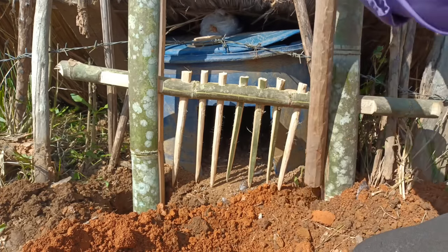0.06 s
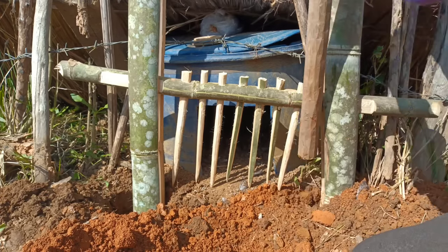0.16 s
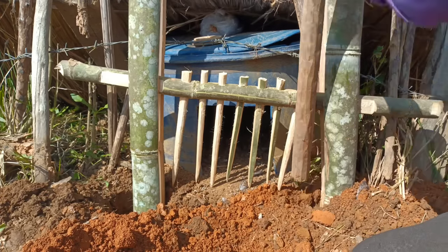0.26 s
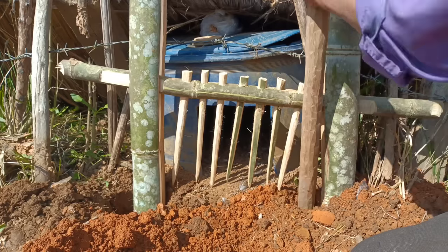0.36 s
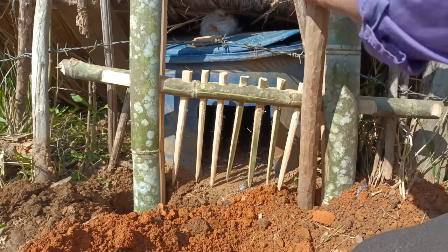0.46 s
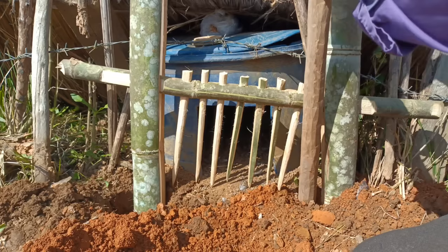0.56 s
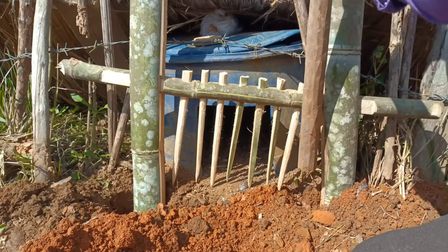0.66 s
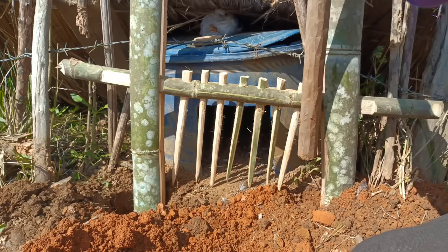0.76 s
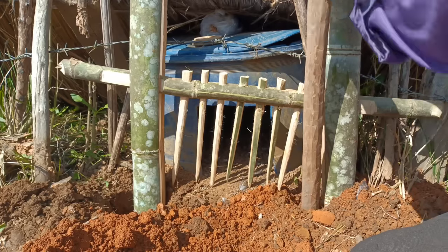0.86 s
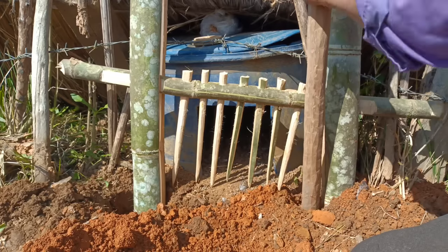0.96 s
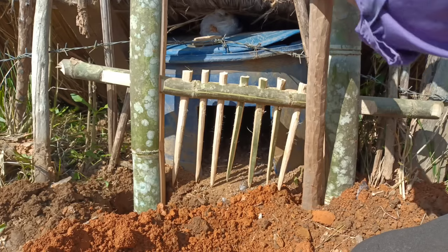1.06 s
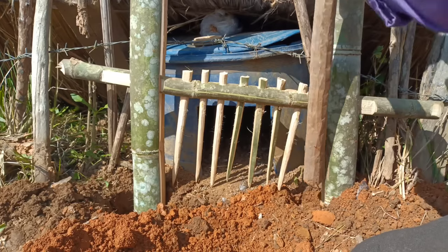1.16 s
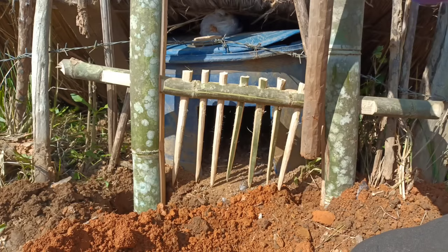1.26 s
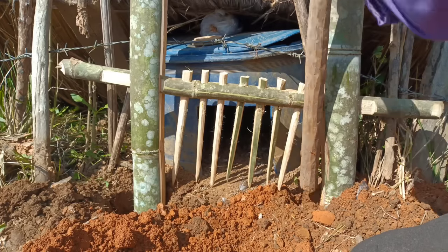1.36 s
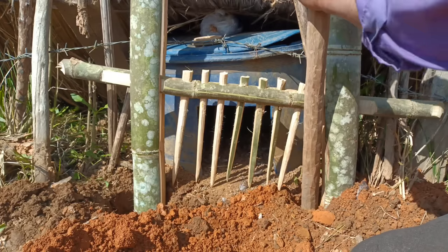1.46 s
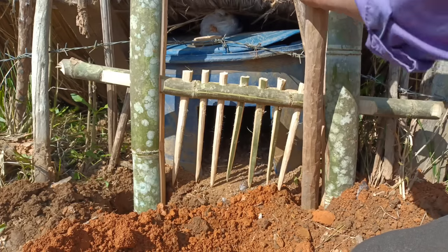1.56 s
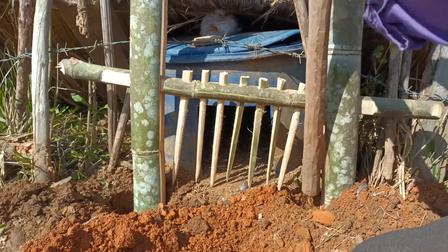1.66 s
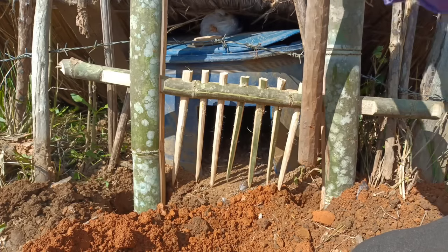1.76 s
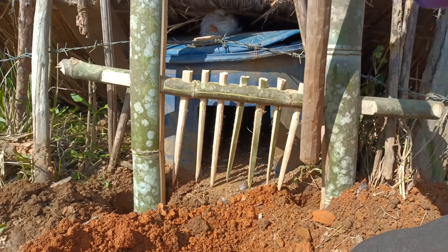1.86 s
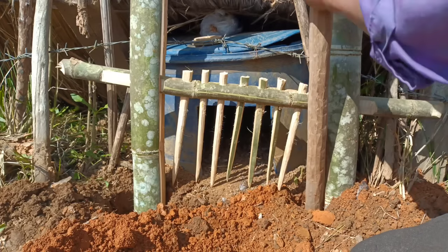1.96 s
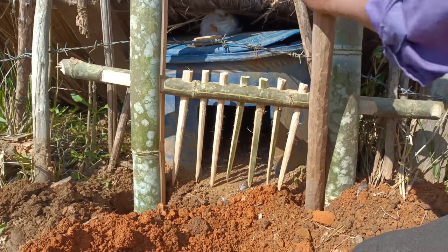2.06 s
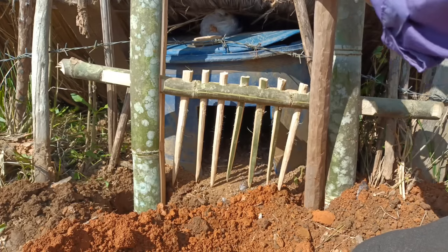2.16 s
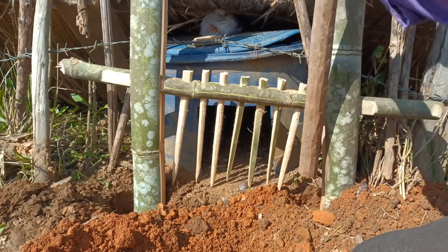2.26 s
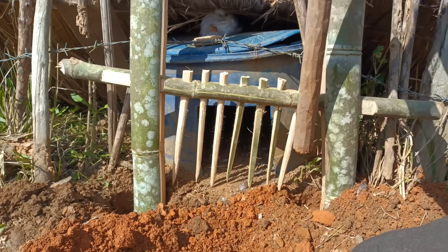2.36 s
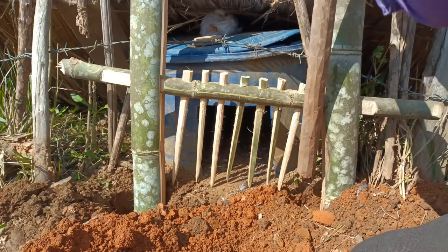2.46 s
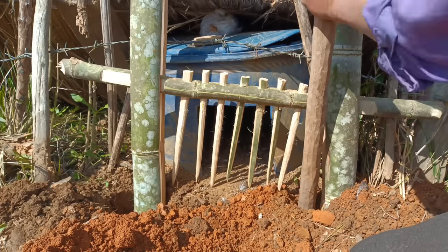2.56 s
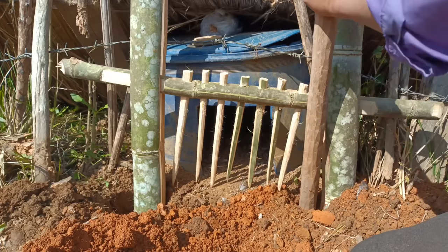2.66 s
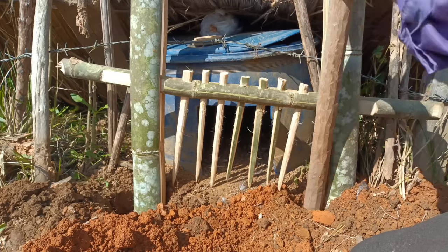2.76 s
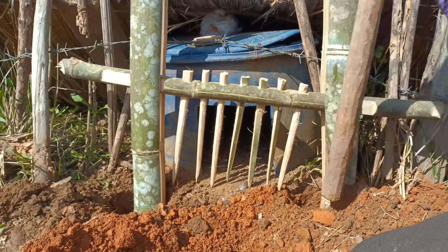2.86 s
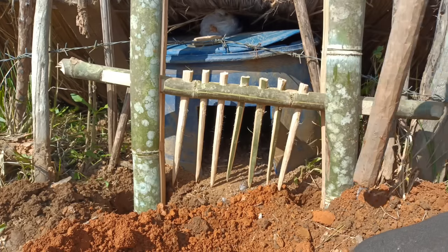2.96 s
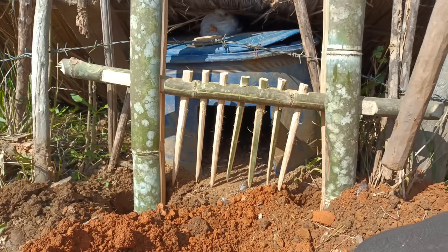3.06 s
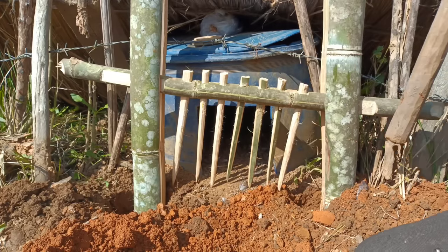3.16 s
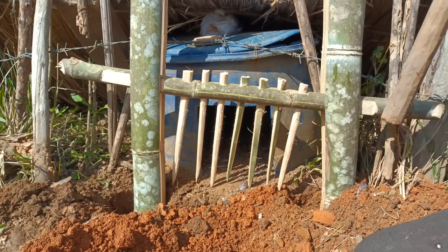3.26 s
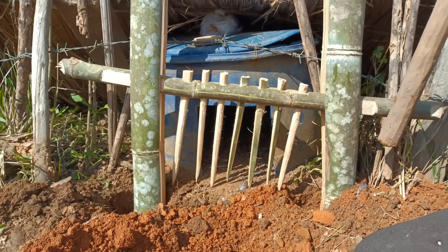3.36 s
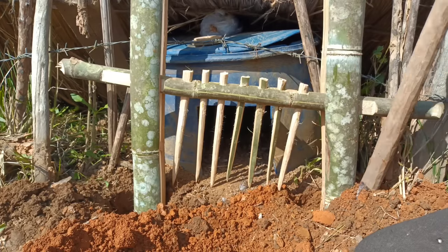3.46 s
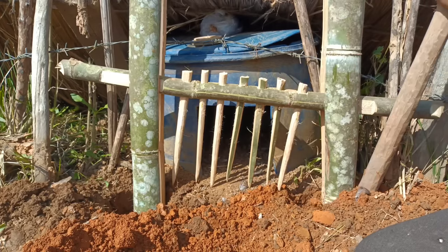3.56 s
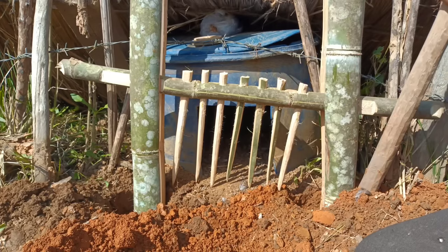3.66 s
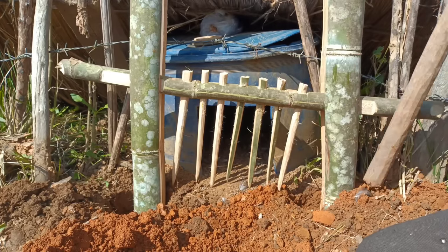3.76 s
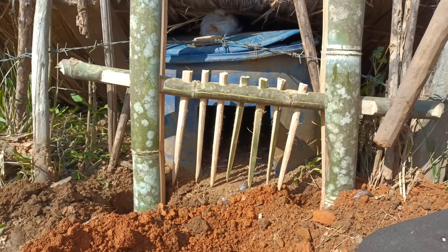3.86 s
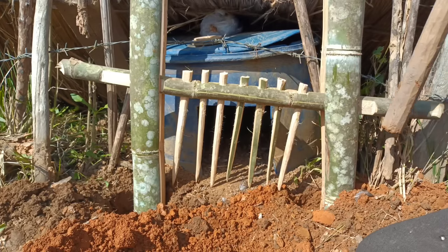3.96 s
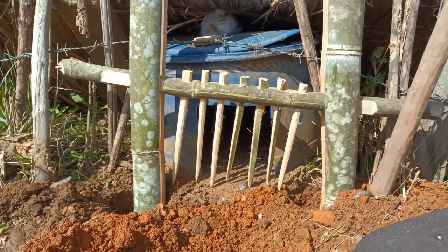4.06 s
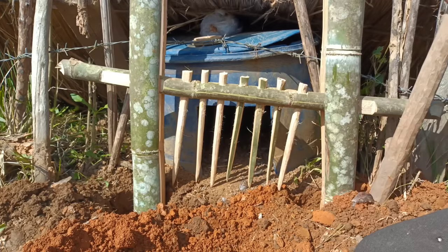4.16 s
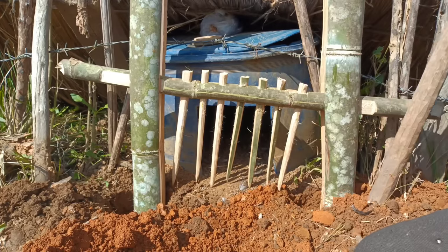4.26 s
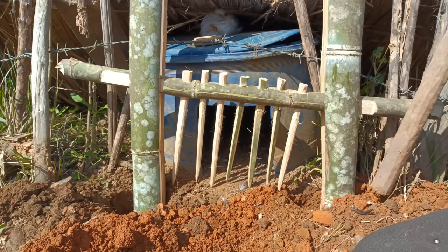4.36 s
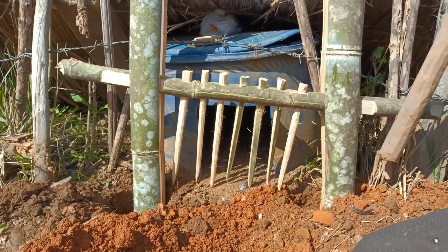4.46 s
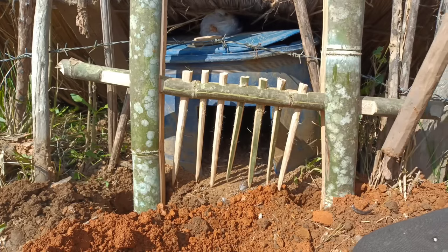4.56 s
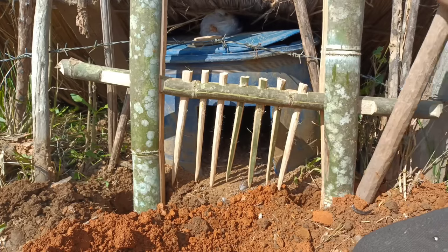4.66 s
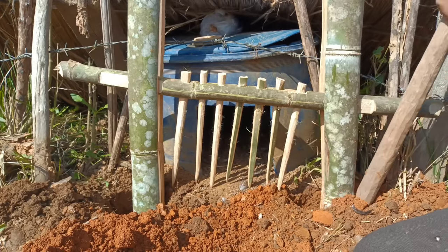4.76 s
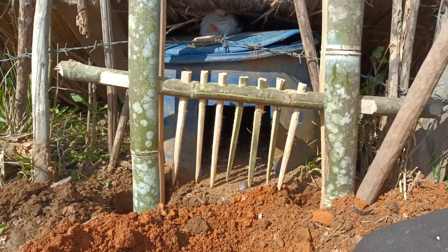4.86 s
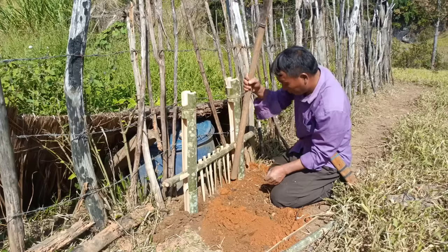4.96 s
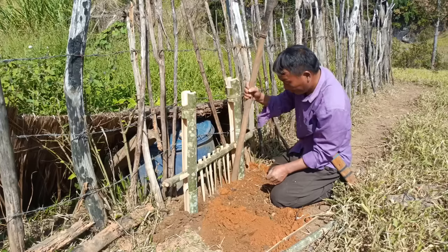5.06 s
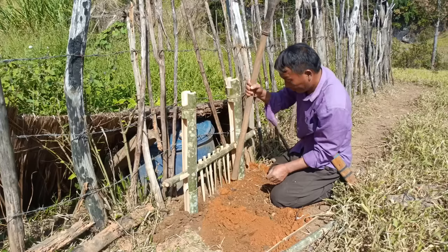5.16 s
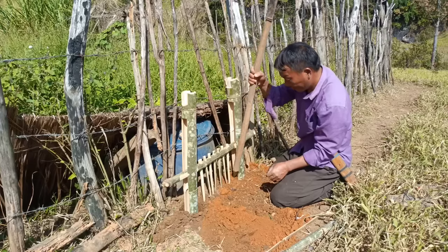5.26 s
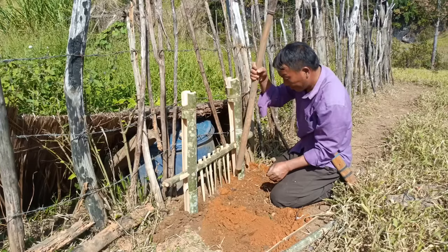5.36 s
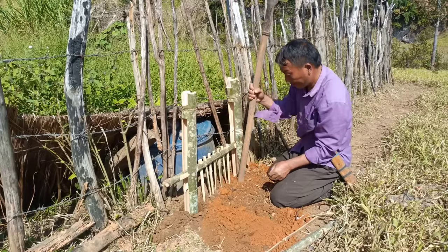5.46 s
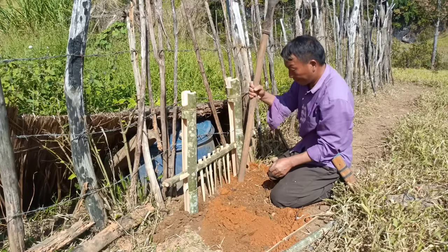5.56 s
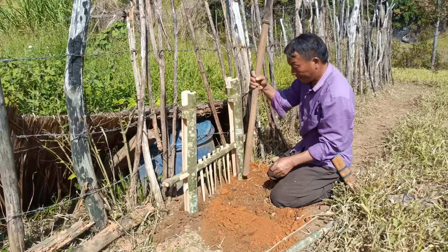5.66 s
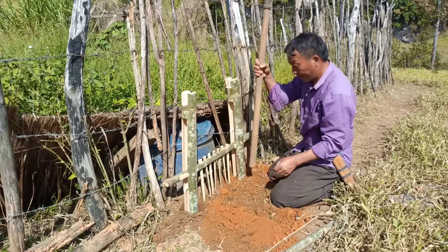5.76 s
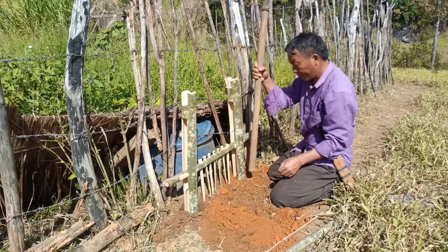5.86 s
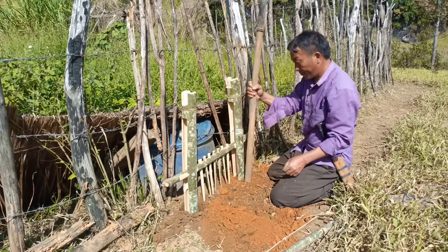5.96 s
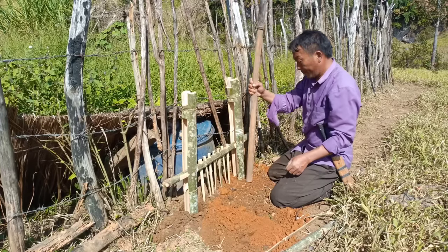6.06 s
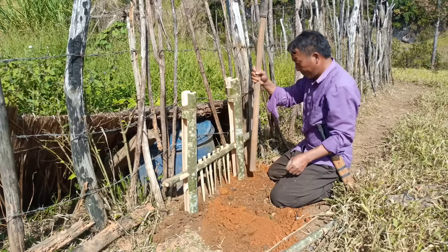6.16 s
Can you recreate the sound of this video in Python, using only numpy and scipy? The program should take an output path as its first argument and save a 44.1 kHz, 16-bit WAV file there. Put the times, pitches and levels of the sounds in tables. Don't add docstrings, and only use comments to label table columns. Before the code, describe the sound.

Outdoors and close, with faint field hiss and soft wind buffets mostly on the left until about 3.7 seconds. A leaf brush at 0.1 precedes a dull knock at 0.2 and a rattling cluster of bamboo knocks, gritty crunch and thud at 0.4. Further strokes land near 0.95, 1.5, 2.05 and 2.6, the 1.5 and 2.6 ones cracking sharply, the last two thudding deepest. Wind is strongest around 1.3-1.8. Dry stalks and cloth rustle between strokes, brushing more at 3.06. A very faint distant hum runs from 3.1 to 4.5. Lighter strokes come at 3.5 and 4.15, then a rattling double one at 4.7. Slightly farther back, a stroke at 5.07 coincides with a clear wire ping; light ticks and a short woody scrape follow around 5.3, with thuds at 5.5 and 6.0. A loud wire ping rings at 6.1.

```python
import sys
import numpy as np
from scipy import signal
from scipy.io import wavfile

SR = 44100
rng = np.random.default_rng(int(sys.argv[2]) if len(sys.argv) > 2 else 0)


def digitize_waveform(pressure):
    field = np.atleast_2d(pressure).T
    bounded = np.clip(field, -1, 1)
    quanta = np.round(bounded * 32767).astype(np.int16)
    wavfile.write(sys.argv[1], SR, quanta)


def voltage_ratio(decibels):
    exponent = np.asarray(decibels, float) / 20
    return 10 ** exponent


N = 273861


def rms_one(x):
    return x / np.sqrt(np.mean(x ** 2) + 1e-20)


def in_time(rows):
    s, *columns = np.transpose(rows)
    return [np.interp(np.arange(N) / SR, s, c) for c in columns]


def at_hz(points, hz):
    points = np.array(points)
    return np.interp(np.log(hz), np.log(points[:, 0]), points[:, 1])


def band(x, low_hz, high_hz):
    sos = signal.butter(2, [low_hz, min(high_hz, .45 * SR)], "band", fs=SR, output="sos")
    return signal.sosfilt(sos, x)


def drift(rate):
    r = np.exp(-80 * np.pi * rate / SR)
    noise = rng.standard_normal(N // 40 + 2002)
    slow = signal.lfilter([1], [1, -2 * r, r * r], noise)[2000:]
    return np.interp(np.arange(N) / 40, np.arange(len(slow)), rms_one(slow))


def ring(clicks, hz, t60):
    r = voltage_ratio(-60 / (max(t60, .001) * SR))
    w = 2 * np.pi * hz / SR
    return signal.lfilter([0, np.sin(w)], [1, -2 * r * np.cos(w), r * r], clicks + 1e-18)


def strike(clicks, modes, tilt_db, spread_db):
    chance = rng.standard_normal((len(modes), 3))
    out = 0
    for k, ((hz, db, t60), (both, left, right)) in enumerate(zip(modes, chance)):
        luck_db = spread_db * (both + 0.61 * np.array([[left], [right]]))
        seen = voltage_ratio(db + tilt_db * np.log2(hz / 2000) + luck_db)
        out = out + (-1) ** k * seen * ring(clicks, hz, t60)
    return out / np.max(np.abs(out.mean(axis=0)))


def add(out, sound, s, pan_db, lag):
    for side, row in enumerate(np.broadcast_to(sound, (2, sound.shape[-1]))):
        at = round(s * SR) + max(lag if side == 0 else -lag, 0)
        out[side, at:at + len(row)] += voltage_ratio(pan_db * (1.5 - side)) * row[:N - at]


# t/s, left port lag/samples
STAKE_LAG = [
    (0, 3),
    (2.9, 3),
    (3.3, 8),
    (4.9, 8),
    (4.93, 2),
    (6.21, 2),
]


def lag_at(s):
    return round(np.interp(s, *np.transpose(STAKE_LAG)))


def grit(low_hz, high_hz, per_s, cycles, alike):
    grain_db_spread = 3.24 * np.minimum(rng.exponential(1, (3, N)), 5)
    sizes = voltage_ratio(grain_db_spread) * rng.choice([-1, 1], (3, N))
    grains = sizes * (rng.random((3, N)) < per_s / SR)
    dealt = rng.integers(0, 8, (3, N))
    both, left, right = sum(ring(grains * (dealt == k), hz, cycles / hz)
                            for k, hz in enumerate(np.geomspace(low_hz, high_hz, 8)))
    lag = in_time(STAKE_LAG)[0].astype(int)
    late = both[np.maximum(np.arange(N) - lag, 0)]
    share = np.clip(alike, 0, 1)
    return rms_one(np.sqrt(share) * np.array([late, both]) + np.sqrt(1 - share) * np.array([left, right]))


# t/s, level/dB
EARLIER_THUD = (-.03, -30)
MURMUR_DB, GRASS_DB = -80, -12.5
SETTLE_DB, SETTLE_FOLLOWS, SETTLE_S = -66, .3, .06


def settling(breeze_db):
    t = np.arange(N) / SR
    level = voltage_ratio(MURMUR_DB) + voltage_ratio(breeze_db + GRASS_DB)
    for s, db, *_ in [EARLIER_THUD] + THUDS:
        since = np.maximum(t - s, 0) / SETTLE_S
        level = level + voltage_ratio(SETTLE_DB + SETTLE_FOLLOWS * (db + 30)) * since * np.exp(1 - since)
    return 20 * np.log10(level)


# f/Hz, level/dB per Hz
QUIET = [(59, -30), (100, 2), (210, -3), (380, -7.5), (680, -20), (2470, -15), (6840, -23.5), (16000, -27)]
# f/Hz, left-right likeness/1
LIKENESS = [(60, 0.91), (180, 0.68), (550, -0.28), (1650, -0.47), (4970, 0.13), (15000, -0.22)]
QUIET_DB = -70.5


def field(murmur_db):
    out = 0
    edges = 90 * 2 ** np.arange(0, 7.8, .5)
    white = rng.standard_normal((2, 2, N))
    for k, (low, high) in enumerate(zip(edges, edges[1:])):
        mid, side = band(white[k % 2], low, high)
        hz = np.sqrt(low * high)
        alike = np.clip(at_hz(LIKENESS, hz), -1, 1)
        swell_db = (murmur_db - murmur_db.mean()) * np.clip(1.2 - np.log2(hz / 300) / 3, 0, 1)
        drift_db = (2.4 if hz < 4000 else 1.0) * drift(15)
        gain = voltage_ratio(at_hz(QUIET, hz) + swell_db + drift_db)
        out = out + gain * (np.sqrt(1 + alike) * mid + np.sqrt(1 - alike) * side * [[1], [-1]])
    return voltage_ratio(QUIET_DB + 3.0) * rms_one(out)


# t/s, level/dB, sharpness/dB
PUFFS = [(0.193, -47.5, -13), (0.66, -48, -9), (0.848, -44.5, -9.5), (0.937, -41.5, -21),
         (1.23, -49.5, -11), (1.286, -38, -2), (1.33, -46, -24), (1.476, -44, -5), (1.551, -38.5, 1),
         (1.609, -39.5, 0), (1.698, -49, 0), (1.764, -32.5, -2.5), (1.811, -30, 1.5), (1.99, -38, -2.5),
         (2.244, -51, -7.5), (2.301, -47, -14), (2.421, -41.5, -8.5), (2.518, -38.5, -5.5),
         (2.727, -50, -3), (2.882, -46.5, -12), (2.932, -49, -19), (3.036, -44.5, -6), (3.174, -50, -18),
         (3.242, -47.5, -17), (3.323, -47, -22), (3.652, -43.5, -8)]


def wind(wind_db):
    out = np.zeros((2, N))
    t = np.arange(-SR // 20, SR // 20) / SR
    for (s, db, sharp_db), (sign, after) in zip(PUFFS, rng.uniform(-0.83, 1, (len(PUFFS), 2))):
        width_s = np.clip(.0022 - 0.00022 * sharp_db, .002, .015)
        press = np.exp(-(t / width_s + 1) ** 2)
        release = (0.94 + 0.73 * after) * np.exp(-(t / width_s / 2.17 - 1) ** 2)
        bump = press - release
        add(out, voltage_ratio(db + 0.5) * np.sign(sign) * bump * [[1], [.03]], s + t[0], 0, 0)
    rumble = rms_one(band(rng.standard_normal((2, N)), 22, 61.7))
    rumble *= voltage_ratio(wind_db + np.array([1.4 + 5 * drift(14), -5 + 3 * drift(24)]))
    return signal.sosfilt(signal.butter(1, 18, "high", fs=SR, output="sos"), out) + rumble


# t/s, half length/s, dry rustle/dB, cloth hiss/dB
STIRS = [
    (0.05, .25, -62, -77),
    (.65, .35, -65, -77),
    (1.5, .13, -62, -75),
    (2.02, .09, -59, -75),
    (2.25, .2, -64, -78),
    (2.8, .2, -64, -80),
    (3.06, .09, -61, -67),
    (5.12, .12, -66, -76),
    (5.75, .25, -72, -74),
    (6.15, .15, -66, -72),
]


def stirring():
    t = np.arange(N) / SR
    level = 1e-6
    for s, length, rustle_db, cloth_db in STIRS:
        level = level + voltage_ratio(np.array([[rustle_db], [cloth_db]])) * np.exp(-((t - s) / length) ** 2)
    return 20 * np.log10(level)


# t/s, fade/s, clods/dB, crumbs/dB, dust/dB
CRUNCH = [(.113, 0.012, -68, -62, -65), (0.226, 0.018, -52, -60, -72), (0.368, 0.01, -46, -53, -68),
          (.379, .005, -52, -54, -58), (.392, .005, -50, -46, -55), (.401, 0.007, -52, -44, -51),
          (.421, 0.006, -65, -55, -57), (0.96, 0.012, -55, -46, -56), (.976, .008, -70, -56, -53),
          (1.494, 0.005, -49, -42, -49), (1.502, .008, -62, -52, -56), (2.051, 0.007, -40, -40, -53),
          (2.062, .006, -55, -58, -50), (2.08, 0.03, -62, -64, -62), (2.6175, 0.004, -54, -40, -54),
          (2.627, .006, -66, -49, -49), (2.654, 0.027, -63, -66, -61), (3.527, 0.012, -70, -53, -54),
          (3.546, .016, -58, -55, -57), (3.575, 0.03, -62, -65, -66), (3.933, 0.012, -68, -60, -71),
          (4.142, 0.013, -60, -52, -56), (4.168, .007, -65, -56, -51), (4.178, 0.025, -58, -59, -63),
          (4.711, 0.007, -48, -50, -57), (4.724, 0.006, -46, -42, -47), (4.736, .008, -48, -47, -54),
          (4.756, 0.025, -54, -58, -68), (5.072, 0.013, -53, -52, -64), (5.531, 0.012, -61, -52, -57),
          (6.002, .007, -66, -52, -54), (6.015, 0.009, -66, -55, -56)]
SWELL_SHARE, SWELL_MAX_S = .65, .013


def crunch(rustle_db, cloth_db):
    t = np.arange(N) / SR
    levels = np.zeros((3, N))
    for s, fade, *dbs in CRUNCH:
        swell = min(SWELL_SHARE * fade, SWELL_MAX_S)
        near = slice(max(round((s - swell) * SR), 0), round((s + 4 * fade) * SR))
        rise = np.clip(1 + (t[near] - s) / swell, 0, 1)
        fall = np.exp(-(np.maximum(t[near] - s, 0) / fade) ** 1.4)
        levels[:, near] += voltage_ratio(np.array(dbs))[:, None] * rise * fall
    clods = levels[0] * voltage_ratio(np.array([[-1.2], [1.2]])) * band(grit(560, 1700, 1200, 14, .8), 450, 3000)
    rustle = voltage_ratio(rustle_db - 10.0 + 2.2 * drift(32))
    crumbs = (levels[1] + rustle) * grit(2176, 4610, 5000, 3.96, 0.37)
    fine = band(grit(5400, 8800, 8000, 6.5, 0.1), 3500, 14000)
    cloth = voltage_ratio(cloth_db - 1.0) * band(fine, 5770, 9300)
    return clods + crumbs + levels[2] * fine + cloth


# t/s, level/dB, f/Hz, length/s
WHISPERS = [
    (.09, -72, 2500, .025),
    (.118, -61, 2500, .012),
    (.118, -66, 8000, .012),
    (.118, -68, 4100, .011),
    (.608, -72, 2600, .012),
    (.69, -78, 4300, 0.03),
    (1.766, -71.5, 3980, 0.032),
    (2.966, -78, 3750, .015),
    (3.192, -76, 4000, 0.058),
    (5.821, -80, 4300, 0.091),
]


def whispers():
    out = np.zeros((2, N))
    t = np.arange(N) / SR
    for s, db, hz, length in WHISPERS:
        near = slice(max(round((s - 3 * length) * SR), 0), round((s + 3 * length) * SR))
        noise = rng.standard_normal((2, SR // 2 + SR // 10))
        hiss = rms_one(band(noise, 0.925 * hz, 1.05 * hz))
        out[:, near] += voltage_ratio(db) * np.exp(-((t[near] - s) / length) ** 2) * hiss[:, :len(t[near])]
    return out


# t/s, peak/dB, loudest low mode f/Hz, loudest high mode f/Hz,
# brightness/(dB/octave)
KNOCKS = [(0.2158, -33.5, 401, 1500, -2.5), (0.2215, -38, 420, 1470, -3), (.225, -40, 500, 1500, -4),
          (.241, -44, 520, 900, -6), (0.3615, -29.5, 670, 3300, -2), (.367, -39, 850, 1600, -3),
          (0.3765, -37, 394, 2500, 1), (0.39, -33, 650, 3460, 0), (.3975, -36, 900, 7200, 3),
          (0.4025, -31, 633, 2560, 2), (0.945, -33, 696, 2550, 0.5), (0.9545, -33, 940, 2430, -1),
          (.958, -34, 1200, 2560, 1), (1.4849, -38, 650, 2800, 5), (1.4904, -24, 1050, 1620, 0),
          (1.4923, -25, 1000, 3900, 4), (1.4948, -31, 680, 5600, 1), (2.042, -35, 746, 2500, 0),
          (2.0455, -33, 480, 3500, 0), (2.0482, -32, 900, 2500, 1), (2.6137, -22, 965, 2100, 2.5),
          (2.617, -26.5, 960, 4200, 3), (2.6187, -20.5, 950, 2500, 3.5), (3.509, -43, 700, 5500, 3),
          (3.5113, -36, 1033, 2150, 2), (3.5265, -39, 1180, 4600, 2), (3.528, -36, 1100, 2570, 2),
          (3.5303, -34, 1180, 2700, 1), (3.555, -45, 1200, 3600, 0), (3.7055, -38, 720, 2000, -.5),
          (4.1398, -36, 597, 4510, 3), (4.1445, -42, 700, 3600, 1), (4.6927, -30, 1040, 2130, 1.5),
          (4.695, -35, 800, 2200, 0), (4.708, -40, 420, 1300, -3), (4.718, -30, 900, 1500, -2),
          (4.7225, -32, 552, 3000, 2), (4.749, -35, 546, 2120, -1.5), (4.7525, -34, 600, 2100, -2),
          (5.0695, -43, 400, 2640, 2),
    (5.0855, -48, 1000, 2700, 2),
    (5.52, -52, 900, 2000, 0),
    (5.5242, -37, 487, 2610, 3.5),
    (5.992, -52, 1220, 2570, 1),
    (6.0005, -42, 1120, 3370, 3),
]
# t/s, peak/dB, loudest low mode f/Hz, brightness/(dB/octave)
TICKS = [(0.1, -55, 417, -1.5), (0.285, -44, 550, -4.5), (0.471, -51, 401, -4), (0.637, -52, 700, -5),
         (0.917, -53, 533, -1.5), (1.053, -57, 420, -4.5), (1.655, -55, 410, -7.5),
         (2.112, -41.5, 560, -10), (2.83, -54, 1003, 4), (2.863, -52, 697, 5), (3.616, -46.5, 724, 3),
         (3.927, -44, 390, -6), (3.934, -47, 400, -8), (4.241, -53, 434, -5), (4.815, -41.5, 556, -4.5),
         (4.953, -45, 600, -3), (5.272, -47, 700, -6), (5.302, -40, 600, -4), (5.324, -42, 1080, -4),
         (5.427, -53, 517, -4), (5.739, -54, 410, -7), (6.197, -51, 576, -2.5)]
# f/Hz, level/dB, t60/s
BAMBOO = [(980, 0, 0.026), (1992, -10, 0.043), (2525, -5, 0.031), (3365, -20, 0.048), (3661, -20, 0.056),
          (4624, -14, 0.04), (5658, -20, 0.059), (6110, -20, 0.042), (6444, -29, 0.065),
          (390, 4, 0.018), (627, -9.5, 0.11), (764, -27.5, 0.09), (1250, -6.5, 0.039), (1510, -7.5, 0.029)]
# f/Hz, level/dB, t60/s
CRACK = [(1500, 3, .005), (3300, 2, .003), (5000, -4, .002)]
SOFT_TICK_HZ, HARD_TICK_HZ = 1430, 2530
HARD_ABOVE_DB = -2
RATTLE_S, RATTLE_SHORTENS_S_PER_DB = .0075, .0003


def knocks(damping=0.5, low_db=2.5, high_db=3.0, low_t60=.006, high_t60=.013):
    out = np.zeros((2, N))
    t = np.arange(SR // 12) / SR
    ticks = [(s, db, hz, HARD_TICK_HZ if tilt > HARD_ABOVE_DB else SOFT_TICK_HZ, tilt)
             for s, db, hz, tilt in TICKS]
    for s, db, low_hz, high_hz, tilt_db in KNOCKS + ticks:
        rattle_s = RATTLE_S - RATTLE_SHORTENS_S_PER_DB * max(db + 35, 0)
        luck = rng.random((2, len(t)))
        clicks = (luck[0] < .016) * (luck[1] - .5) * 1.1 * np.exp(-t / max(rattle_s, .0005))
        clicks[0] = -1
        modes = [(f, d, damping * min(t60, 70 / f)) for f, d, t60 in BAMBOO] + CRACK
        modes += [(low_hz, low_db, 15.0 / low_hz + low_t60), (high_hz, high_db, high_t60)]
        add(out, voltage_ratio(db) * strike(clicks, modes, tilt_db, spread_db=2.5), s - .0003, -2.2, lag_at(s))
    return out


def echoes(x):
    dull = band(x, 120, 2100)
    return sum(voltage_ratio(db) * np.pad(dull[::-1], ((0, 0), (round(s * SR), 0)))[:, :N]
               for s, db in [(.009, -22), (.021, -29)])


# t/s, ground/dB, ground f/Hz, dent/dB
THUDS = [(.22, -44, 125, -49), (.283, -51, 150, -56), (.396, -33.5, 91.5, -35), (.43, -42, 92, -48),
         (.96, -36, 72, -44), (1.496, -35.5, 75, -43), (2.049, -25, 62, -34), (2.107, -42, 125, -48),
         (2.6195, -25.5, 68, -37), (3.5405, -41, 78, -40), (4.165, -29.5, 105, -38),
         (4.7195, -29.5, 90, -28), (4.748, -35, 104, -36), (4.813, -42, 150, -47), (5.0695, -29.5, 85, -31),
         (5.5265, -31.5, 85, -35), (6.0105, -33.5, 92, -36)]
# t/s, level/dB, f/Hz
SWINGS = [(.23, -46, 170), (.287, -53, 190), (.4115, -36, 143), (.44, -42, 146), (.9735, -45, 150),
          (.9915, -43, 137), (1.505, -42, 143), (1.522, -42, 120), (2.061, -28.5, 120), (2.116, -44, 145),
          (2.6175, -32, 190), (2.6295, -25, 108), (3.5655, -39, 150), (3.926, -48, 165), (4.167, -36, 195),
          (4.1815, -34, 125), (4.737, -33, 145), (4.7515, -36, 160), (4.817, -44, 190), (5.08, -27, 139),
          (5.5375, -31, 137), (6.019, -36, 139)]
DENT_HZ = 300


def thuds(push_s=0.0031, ground_t60=0.085, post_t60=0.11):
    out = np.zeros((2, N))
    push = np.zeros(SR // 3)
    push[:round(push_s * SR)] = np.hanning(round(push_s * SR)) * 2 / (push_s * SR)
    rebound = np.roll(push, round(0.0019 * SR))
    for s, ground_db, ground_hz, dent_db in THUDS:
        dent = voltage_ratio(dent_db) * ring(push, DENT_HZ, 0.03)
        ground = voltage_ratio(ground_db) * ring(rebound, ground_hz, ground_t60)
        add(out, ground - dent, s - push_s / 2, -.6, lag_at(s))
    for s, db, hz in SWINGS:
        above = 0.3 * ring(push, 1.36 * hz, 0.88 * post_t60) + 0.25 * ring(push, 200.7, 0.084)
        add(out, voltage_ratio(db) * (above - ring(push, hz, post_t60)), s - push_s / 2, -.6, lag_at(s))
    return band(out, 48, 2000)


# t/s, peak/dB, left-right/dB
PINGS = [
    (5.021, -56.5, 0.5),
    (5.065, -36.5, 1.9),
    (.652, -63, 0),
    (6.1058, -30.5, 4.2),
]
# f/Hz, level/dB, t60/s
STRANDS = [
    [(1300, -4, .15), (6050, -10, .04), (7060, -2, 0.38), (7950, -1, 0.065)],
    [(2640, 0, 0.055), (3400, -3, .055), (4375, -1.5, 0.08), (5394, 1, 0.05), (6120, -3, .012),
     (7460, -18, 0.09), (8550, -5, 0.03)],
    [(3850, 0, .12), (7000, -1, .2), (7900, -1, .12), (9600, -3, .1)],
]
BAR_HZ = [1298, 2608, 2897, 3740, 4375, 5385, 6945, 7466, 8550, 5943, 9604, 11080, 14150, 15310]
# level/dB, t60/s
BAR = [(0, 0.11), (-14, 0.12), (-7, 0.15), (-7, 0.035), (-1.5, 0.1), (-9, 0.07), (-7.5, 0.035), (-11, 0.22),
       (-6, 0.03), (-7.5, .03), (-14, .02), (-20, .022), (-21, .025), (-24, .028)]
WIRE_LAG = -21


def pings():
    out = np.zeros((2, N))
    t = np.arange(SR // 4) / SR
    for (s, db, pan_db), modes in zip(PINGS, STRANDS + [np.c_[BAR_HZ, BAR]]):
        scratch = rng.standard_normal((2, len(t))) * np.exp(-t / .004)
        ringing = strike(1. * (t == 0), modes, np.array([[1.5], [-1.5]]), spread_db=.7)
        sound = band(band(ringing + 0.25 * scratch, 1230, 12000), 1140, 18000)
        add(out, voltage_ratio(db) * sound, s, pan_db, WIRE_LAG)
    return out


# t/s, level/dB
DRONE = [
    (3.05, -85),
    (3.2, -73),
    (4.0, -75),
    (4.4, -73),
    (4.6, -92),
]
# f/Hz, level/dB
DRONE_LINES = [(160, -3), (264, -1), (393, -15)]


def drone():
    waver = np.cumsum(1 + 0.00825 * drift(3)) / SR
    lines = sum(voltage_ratio(db) * np.sin(2 * np.pi * hz * waver) for hz, db in DRONE_LINES)
    return voltage_ratio(in_time(DRONE)[0]) * lines


# t/s, pressure/dB
SCRAPE = [
    (5.25, -77.5),
    (5.272, -64),
    (5.31, -62),
    (5.355, -54.5),
    (5.378, -59),
    (5.39, -75),
    (5.415, -76),
    (5.43, -69),
    (5.48, -78),
]
SCRAPE_UPPER_DB, SCRAPE_BRIGHTENS_DB_PER_S = -10, 70
SCRAPE_FREE_S = 5.36


def scrape():
    body_db, = in_time(SCRAPE)
    start_s = SCRAPE[0][0]
    dragged_s = np.clip(np.arange(N) / SR, start_s, SCRAPE_FREE_S) - start_s
    upper_db = body_db + SCRAPE_UPPER_DB + SCRAPE_BRIGHTENS_DB_PER_S * dragged_s
    body = band(grit(466, 1580, 2200, 30.0, 0.97), 385, 2700)
    return voltage_ratio(body_db) * body + voltage_ratio(upper_db) * grit(1580, 3860, 4000, 9.2, 0.53)


# t/s, level/dB
BREEZE = [(0.0, -65), (0.31, -80), (0.66, -67), (1.42, -66), (1.57, -54), (1.8, -57), (1.92, -70),
          (2.35, -67), (2.65, -61), (2.95, -69), (3.13, -59), (3.3, -67.5), (4.0, -68), (4.8, -66),
          (5.0, -73), (5.3, -74), (6.21, -67)]


def scene():
    breeze_db, = in_time(BREEZE)
    around = field(settling(breeze_db)) + wind(breeze_db) + drone()
    friction = crunch(*stirring()) + whispers() + scrape()
    work = knocks() + thuds() + pings()
    return around + friction + work + echoes(work)


def low_pass(x):
    return signal.sosfilt(signal.butter(12, 16460, fs=SR, output="sos"), x)


def record(dry):
    mix = signal.sosfilt(signal.cheby2(12, 60, 16500, fs=SR, output="sos"), dry)
    return low_pass(mix)


dry = scene()
out = record(dry)
digitize_waveform(out)
```